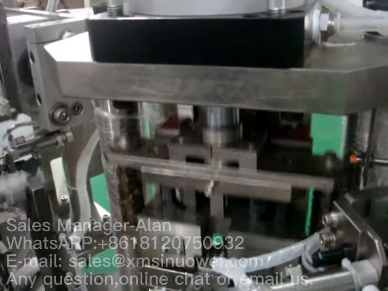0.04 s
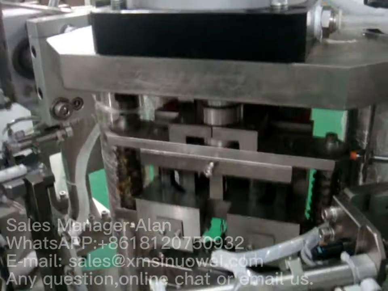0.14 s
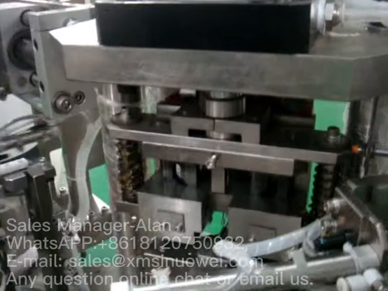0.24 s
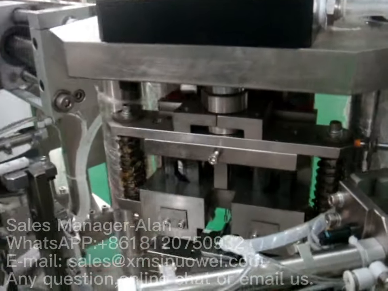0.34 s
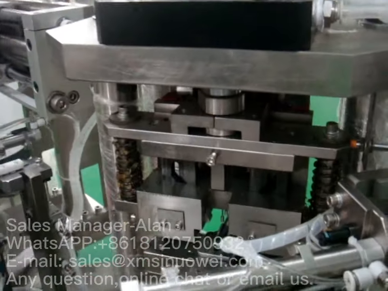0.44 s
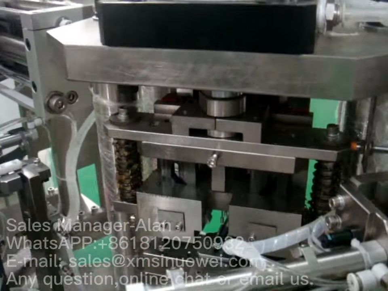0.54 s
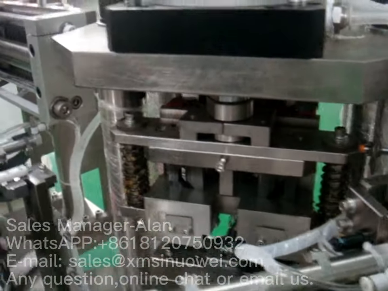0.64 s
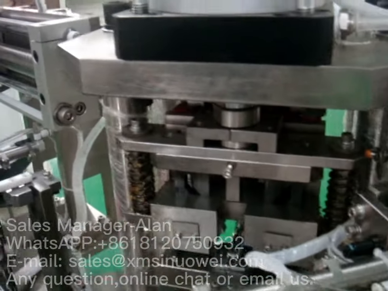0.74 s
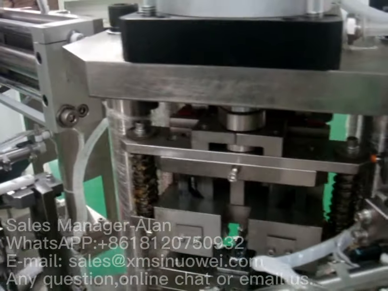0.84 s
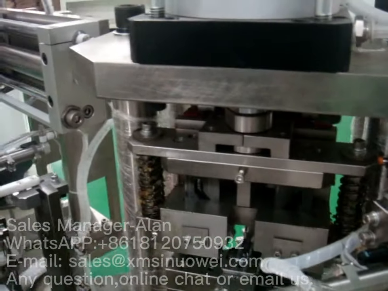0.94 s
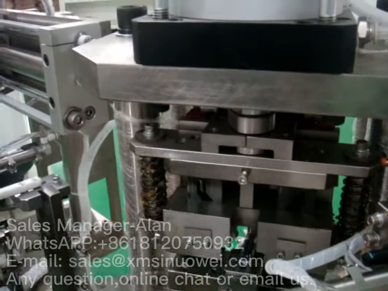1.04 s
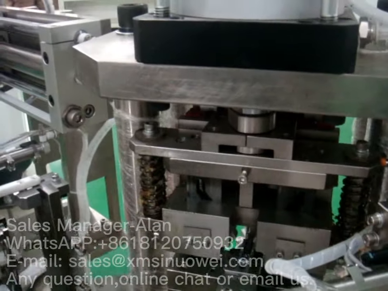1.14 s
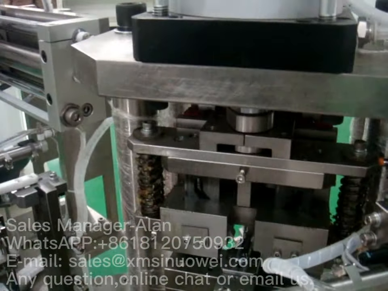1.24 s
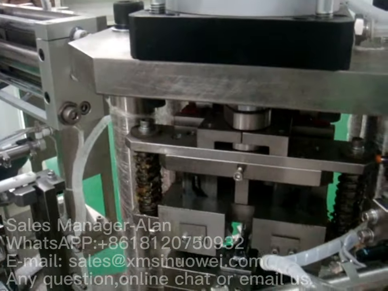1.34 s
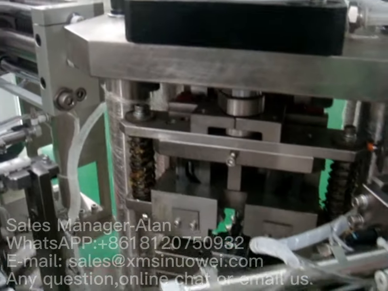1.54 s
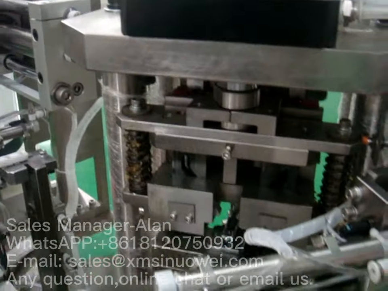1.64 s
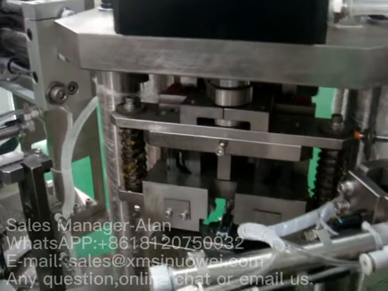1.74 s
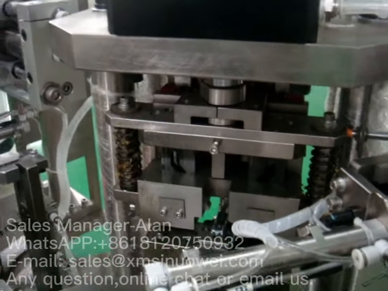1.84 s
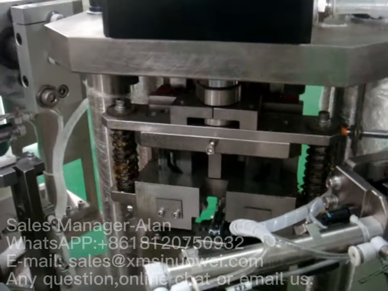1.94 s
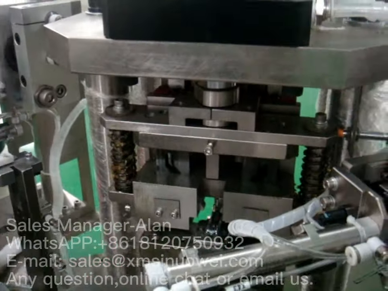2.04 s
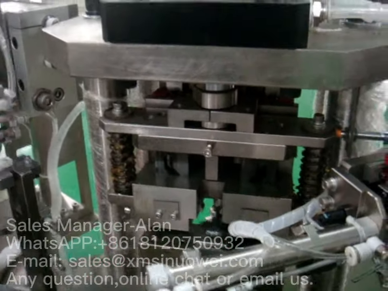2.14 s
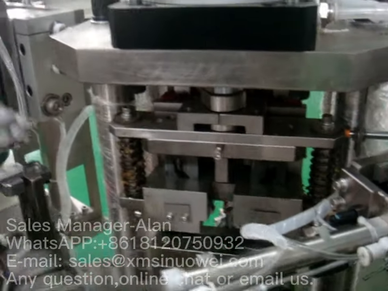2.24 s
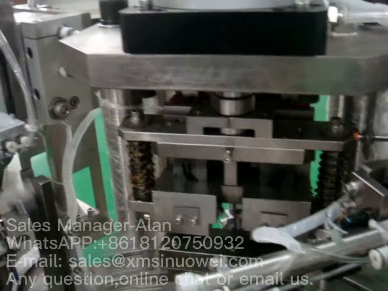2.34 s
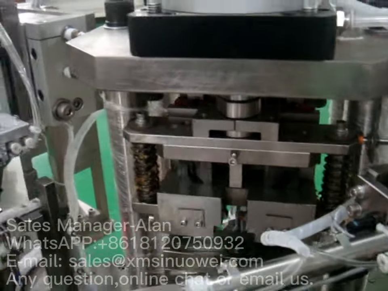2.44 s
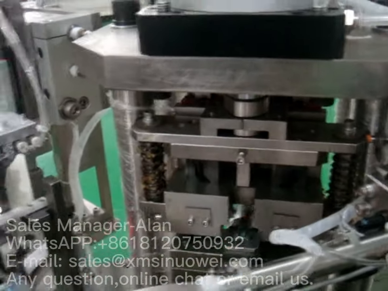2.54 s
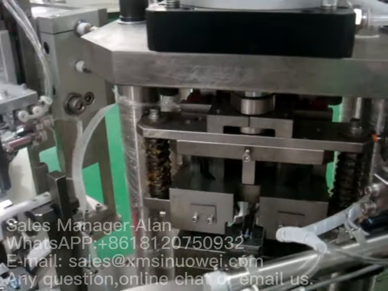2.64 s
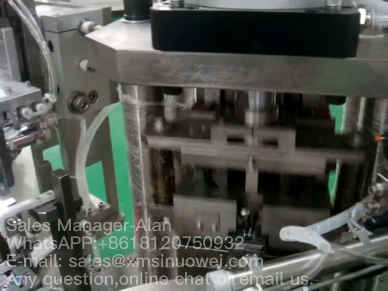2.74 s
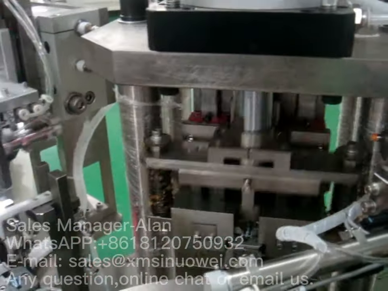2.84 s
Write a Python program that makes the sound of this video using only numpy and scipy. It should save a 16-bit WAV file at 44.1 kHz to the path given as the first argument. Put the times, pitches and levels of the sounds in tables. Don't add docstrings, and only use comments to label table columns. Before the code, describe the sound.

Throughout seven seconds, vibratory feeders close to one microphone give a steady, dense, bright hiss of tiny metal impacts, faintly pulsing at mains rate. Low-mid rumble from distant machines lies beneath, with a short dull hall echo. Quick knocks and clicks come at 0.25 to 0.55 s, then a valve snap at 0.77. Press and slide knocks fall near 1.05, a faint plate ring at 1.4, and pings and blows at 1.5 to 1.9. More pings follow around 2.4. A hard latch and press clack with air cracks hits at 2.8 to 2.95. Clicks continue from 3.4; a sharp snap lands at 4.05, a knock cluster at 4.45, then a bright plate ring at 4.57. A puff sounds at 5.08, a ringing clack at 5.68. The strongest valve and press burst comes at 6.2 to 6.45, with final clacks at 6.75 to 6.95. Loud peaks briefly dip the level.

```python
import sys
import numpy as np
from scipy import signal
from scipy.fft import rfft, irfft
from scipy.io import wavfile
from scipy.ndimage import uniform_filter1d

SR = 44100
rng = np.random.default_rng(int(sys.argv[2]) if len(sys.argv) > 2 else 0)


def undo_db(level):
    steps = np.asarray(level, float) / 20
    return 10 ** steps


def unload_audio(sound):
    columns = np.transpose(np.atleast_2d(sound))
    steps = np.round(np.clip(columns, -1, 1) * 32767)
    wavfile.write(sys.argv[1], SR, steps.astype(np.int16))


N = 306915
THIN_FROM_HZ = 5000
CYCLE_S = 3.396


def evened(x):
    return x / np.sqrt(np.mean(x ** 2) + 1e-20)


def drift(count, span):
    noise = rng.standard_normal(count)
    return evened(uniform_filter1d(uniform_filter1d(noise, span), span))


def curve(rows):
    return np.interp(np.arange(N) / SR, *np.transpose(rows))


def add(mix, s, sound):
    part = mix[round(s * SR):][:len(sound)]
    part += sound[:len(part)]


def coloured(x, spectrum, patchy_db, size):
    hz, _, z = signal.stft(x, SR, nperseg=size)
    f, db = np.transpose(spectrum)
    patches = evened(uniform_filter1d(uniform_filter1d(rng.standard_normal(z.shape), 5, 0), 5, 1))
    shape_db = np.interp(np.log(hz + 1), np.log(f + 1), db)[:, None] + patchy_db * patches
    return evened(signal.istft(z * undo_db(shape_db), SR, nperseg=size)[1][:N])


def resonate(x, hz, width_hz):
    r = np.exp(-np.pi * width_hz / SR)
    return signal.lfilter([1, 0, -1], [1, -2 * r * np.cos(2 * np.pi * hz / SR), r * r], x)


def mode_comb(x, depth_db, width_hz):
    z = rfft(x)
    ripple = drift(len(z), int(width_hz * N / SR))
    return evened(irfft(z * undo_db(depth_db * ripple), N))


def hall():
    # (time [s], level [dB])
    rumble_level = [(0.0, -30.5), (0.39, -31.5), (0.6, -30), (1.45, -32), (2.29, -29), (2.81, -30.5),
                    (3.0, -28.5), (3.35, -31.5), (4.13, -29), (4.38, -30), (4.86, -29.5), (5.6, -27.5),
                    (5.83, -28.5), (6.42, -28), (6.96, -29.5)]
    # (frequency [Hz], density [dB per Hz])
    rumble_colour = [(29, -70), (50, -45), (78, -29), (120, -17.5), (160, -17.5), (227, -16.5), (414, -9.5),
                     (530, -5), (679, -5), (968, 0.5), (1050, -3.5), (1340, -5.5), (2000, -3.5),
                     (2600, -13.5), (4400, -120)]
    # (time [s], level [dB])
    drone_level = [(0.0, -55), (0.27, -59), (1.24, -55.5), (2.13, -75), (2.3, -64), (3.55, -59),
                   (4.34, -49.5), (4.84, -61), (6.59, -53), (6.96, -59)]
    noise = mode_comb(rng.standard_normal(N), depth_db=3.0, width_hz=6.5)
    rumble = coloured(noise, rumble_colour, patchy_db=1.38, size=1024)
    drone = evened(resonate(resonate(rng.standard_normal(N), 185, 40), 206, 60))
    return undo_db(curve(rumble_level)) * rumble + undo_db(curve(drone_level) + 2.0) * drone


def walls(x):
    t = np.arange(SR // 2) / SR
    echoes = rng.choice([-1., 1.], len(t)) * (rng.random(len(t)) < .05) * (t > .012)
    tail = signal.lfilter(*signal.butter(1, 3000, fs=SR), echoes * undo_db(-60 * t / 0.7))
    return signal.fftconvolve(x, tail / np.linalg.norm(tail))[:N]


def blows(rows, rise_ms, ragged, spread, crack_db, gain_db):
    out, t = np.zeros(N), np.arange(9000) / SR
    chance = rng.standard_normal((len(rows), 8 + len(t)))
    for (s, db, hz, t60), c in zip(rows, chance):
        near = sum(np.sin(2 * np.pi * hz * np.exp(spread * c[k]) * t + 2 * c[4 + k]) for k in range(4))
        scrape_band = signal.butter(2, [hz / 1.41, hz * 2.08], "bandpass", fs=SR)
        scrape = evened(signal.lfilter(*scrape_band, c[8:]))
        crack_band = signal.butter(2, [hz / 1.18, hz * 1.84], "bandpass", fs=SR)
        crack = evened(signal.lfilter(*crack_band, c[:7:-1]))
        body = np.sin(2 * np.pi * hz * t)
        sound = np.sqrt(1 - ragged) * body + np.sqrt(ragged) * (0.34 * near + 0.54 * scrape)
        sound += undo_db(crack_db) * ragged * crack * np.exp(-t / 0.018)
        rise = (rise_ms + 0.5 * max(-22 - db, 0)) / 1000
        onset = np.sin(np.pi / 2 * np.minimum(t / rise, 1)) ** 2
        shape = onset * undo_db(-60 * np.maximum(t - rise, 0) / t60)
        strength = np.sqrt(2 * np.sum((shape * sound) ** 2) / np.sum(shape ** 2))
        add(out, s, undo_db(db + gain_db) * shape * sound / strength)
    return out


def cylinder_thuds():
    # (time [s], peak [dB], body [Hz], t60 [s])
    thud_rows = [(0.255, -28.5, 440, 0.049), (0.542, -26, 427, 0.07), (2.228, -39, 353, 0.078),
                 (1.043, -33, 388, 0.13), (1.123, -27, 600, 0.039), (1.268, -24, 470, 0.2),
                 (1.29, -28, 330, 0.12), (1.3, -36, 290, 0.1), (1.674, -21, 484, 0.096),
                 (1.702, -30, 410, 0.095), (1.744, -44, 295, 0.054), (2.105, -28, 414, 0.058),
                 (2.159, -27, 405, 0.04), (3.055, -37, 293, 0.051), (3.476, -24.5, 517, 0.073),
                 (2.932, -30, 506, 0.054), (3.833, -28, 441, .091), (3.875, -34, 194, 0.16),
                 (4.472, -35, 305, 0.17), (4.522, -27, 330, 0.09), (4.555, -37, 348, .07),
                 (4.482, -30, 600, .07), (4.692, -35, 300, .07), (6.33, -30, 543, 0.12),
                 (6.45, -31, 413, .07), (0.275, -27, 600, 0.026), (4.756, -31, 388, 0.065),
                 (5.108, -30.5, 430, 0.15), (6.063, -28, 337, 0.12), (6.254, -38, 226, 0.073),
                 (6.782, -22, 610, 0.086)]
    return blows(thud_rows, rise_ms=3.8, ragged=0.93, spread=0.061, crack_db=-3.0, gain_db=0.0)


def cushioned_stops():
    # (time [s], peak [dB], body [Hz], t60 [s])
    stop_rows = [
        (0.13, -27, 470, 0.036),
        (1.32, -32, 388, 0.15),
        (2.068, -24.5, 394.4, 0.1),
        (4.468, -26, 385, 0.06),
        (4.495, -24.5, 388, 0.062),
        (5.353, -26, 379, 0.045),
        (5.363, -21, 403, 0.036),
    ]
    return blows(stop_rows, rise_ms=7.8, ragged=0.22, spread=0.045, crack_db=0.0, gain_db=1.0)


def machine_frame(thuds):
    # (frequency [Hz], width [Hz], level [dB])
    frame_modes = [(388, 4.8, 1.5), (429, 15, -6.5), (315, 7.6, -16.5), (290, 11, 1)]
    return sum(undo_db(db + 3.0) * np.pi * width_hz / SR * resonate(thuds, hz, width_hz)
               for hz, width_hz, db in frame_modes)


def slide_knocks():
    # (time [s], peak [dB], body [Hz], t60 [s])
    knock_rows = [(0.262, -19, 1150, 0.031), (0.272, -24, 806, 0.027), (1.047, -22, 1494, 0.077),
                  (4.447, -26, 1540, 0.16), (4.464, -24.5, 1060, 0.12), (0.48, -16, 1540, 0.022),
                  (0.545, -20, 1000, .036), (0.555, -20, 1750, 0.039), (0.773, -26, 1647, 0.032),
                  (1.116, -29, 1590, .067), (1.285, -22, 1390, 0.049), (1.7, -31, 1080, 0.048),
                  (1.762, -28, 950, .046), (3.558, -21, 800, 0.013), (3.773, -20, 1500, .039),
                  (4.086, -20, 760, 0.03), (4.226, -21, 1045, 0.045), (4.256, -23, 1050, 0.043),
                  (4.409, -31, 1490, .035), (4.755, -22, 936, 0.037), (5.47, -25, 824, .1),
                  (2.914, -20.5, 1180, 0.059), (6.324, -20, 850, 0.06), (6.362, -26, 990, .09),
                  (6.764, -21, 1056, 0.044), (5.075, -32, 1660, .036), (5.674, -24.5, 737, 0.058),
                  (6.31, -17, 1740, 0.024), (0.258, -36, 1450, .03), (6.797, -21, 1430, 0.021),
                  (6.941, -15.5, 1220, 0.052)]
    return blows(knock_rows, rise_ms=2.4, ragged=0.69, spread=0.083, crack_db=-12.0, gain_db=3.0)


def twice(rows):
    first = [(s, db, hz, t60) for s, db, _, hz, t60 in rows]
    second = [(s + CYCLE_S, db, hz, t60) for s, _, db, hz, t60 in rows]
    return first + second


def press():
    # (time [s], peak [dB], peak a cycle later [dB], body [Hz], t60 [s])
    press_rows = [(1.049, -24, -24.5, 870, 0.12), (1.05, -29, -21.5, 572, 0.16),
                  (1.078, -30, -36, 697, 0.11), (1.678, -32, -16, 620, 0.11),
                  (1.684, -21.5, -22, 676, 0.14), (1.68, -21, -18, 2715, 0.12), (2, -20, -30, 3430, 0.037),
                  (2.917, -21, -10.5, 942, 0.068), (2.917, -16.5, -23, 620, 0.056),
                  (2.916, -15.5, -18.5, 2530, 0.14), (2.955, -22, -32, 856, 0.067),
                  (3.068, -20.5, -20.5, 535, 0.048)]
    # (time [s], peak [dB], peak a cycle later [dB], body [Hz], t60 [s])
    latch_rows = [
        (1.0465, -20, -14, 1250, 0.035),
        (2.815, -13, -8.5, 1277, 0.023),
        (3.371, -19, -17.5, 1260, 0.03),
    ]
    strokes = blows(twice(press_rows), rise_ms=2.7, ragged=0.83, spread=0.072, crack_db=-7.0, gain_db=3.0)
    latches = blows(twice(latch_rows), rise_ms=1.9, ragged=0.59, spread=0.066, crack_db=-23, gain_db=2.5)
    return strokes + latches


def part_pings():
    # (time [s], peak [dB], body [Hz], t60 [s])
    ping_rows = [(0.463, -13.5, 3070, 0.029), (0.673, -17, 4830, 0.039), (1.596, -17, 3450, .05),
                 (1.528, -20, 2760, 0.035), (1.529, -15.5, 3040, 0.049), (1.594, -15, 2790, 0.054),
                 (1.68, -19, 930, 0.1), (1.724, -18, 2770, .036), (1.907, -13, 3050, 0.049),
                 (2.371, -12, 2470, 0.042), (2.386, -17, 2380, 0.048), (2.438, -16.5, 2860, 0.046),
                 (2.438, -18, 3060, .046), (2.596, -20, 1530, 0.049), (2.673, -15.5, 3030, 0.051),
                 (4.054, -12.5, 4940, 0.029), (4.153, -19, 1740, 0.08), (4.295, -18, 3490, 0.11),
                 (4.443, -18, 978, 0.25), (4.547, -23, 1680, .061), (5.075, -17, 947, 0.11),
                 (5.414, -23, 1356, 0.065), (6.707, -17, 2580, .03), (6.308, -17, 3600, 0.064),
                 (6.776, -16, 2820, 0.058)]
    return blows(ping_rows, rise_ms=3.3, ragged=0.16, spread=.05, crack_db=-13.5, gain_db=0.5)


def gripper_clicks():
    # (time [s], peak [dB], body [Hz], t60 [s])
    click_rows = [(0.547, -15, 3030, 0.06), (0.86, -21, 2750, 0.037), (2.251, -19, 2620, .035),
                  (3.519, -19.5, 3900, .042), (3.703, -17, 5170, 0.037), (3.735, -10.5, 3040, 0.026),
                  (3.928, -10.5, 5750, 0.028), (4.051, -16.5, 2680, 0.039), (4.395, -17, 2360, .038),
                  (4.486, -28, 2560, 0.044), (5.6755, -10, 2384, 0.036), (5.688, -19, 2430, 0.053),
                  (5.788, -16, 1900, 0.038), (6.021, -25, 5800, 0.025), (6.451, -11.5, 2520, .035),
                  (5.676, -22.5, 1960, 0.039), (6.308, -13, 2064, 0.042), (6.316, -20, 3100, 0.062),
                  (6.334, -19, 2060, 0.065), (2.816, -15, 3020, 0.045), (2.538, -17, 2570, 0.046),
                  (2.596, -17.5, 2200, .04), (4.45, -15, 3080, .04), (0.479, -17, 3060, 0.027),
                  (5.588, -18, 2440, 0.083), (6.796, -17, 3990, .04)]
    return blows(click_rows, rise_ms=1.2, ragged=0.56, spread=0.064, crack_db=-11, gain_db=-0.5)


def valve_snaps():
    # (time [s], peak [dB], t60 [s])
    snap_rows = [
        (0.773, -2.5, 0.12),
        (2.816, -8, 0.054),
        (2.913, -2, 0.04),
        (2.922, -1.5, 0.1),
        (4.051, -0.5, 0.04),
        (5.075, -4, 0.092),
        (5.676, -16, .05),
        (6.305, -2.5, 0.11),
        (6.311, 5, 0.072),
        (6.321, -6, 0.08),
    ]
    out, t = np.zeros(N), np.arange(5000) / SR
    band = signal.butter(2, [600, 4200], "bandpass", fs=SR)
    for s, db, t60 in snap_rows:
        puff = evened(signal.lfilter(*band, rng.standard_normal(len(t))))
        add(out, s, undo_db(db - 15.5 - 60 * t / t60) * puff * np.minimum(t / 0.0007, 1))
    return out


def metal_ticks():
    # (time [s], peak [dB], centre [Hz])
    tick_rows = [(0.308, -13, 3500), (0.48, -12, 2200), (0.549, -12, 3000), (0.7732, -14, 2500),
                 (2.913, -14, 3500), (2.9162, -7, 2600), (2.9208, -14, 2200), (2.923, -11, 1800),
                 (4.0527, -5.5, 3000), (4.057, -7, 4500), (1.6815, -12, 2500), (1.69, -12, 2800),
                 (1.595, -12.5, 3000), (1.909, -14, 3000), (4.0922, -12, 5000), (4.4435, -9, 1300),
                 (5.0758, -13, 1500), (5.679, -4, 2300), (6.313, -15, 2200), (6.3226, -5, 2800),
                 (6.379, -11, 4500)]
    out, t = np.zeros(N), np.arange(200) / SR
    for s, db, hz in tick_rows:
        add(out, s, -undo_db(db + 4.0) * np.sin(2 * np.pi * hz * t) * np.exp(-1.8 * hz * t))
    return signal.lfilter(*signal.butter(3, 550, "highpass", fs=SR), out)


def plate_rings():
    # (time [s], peak [dB])
    strikes = [
        (1.385, -11.5),
        (4.569, -3),
        (5.6794, -12.5),
    ]
    # (frequency [Hz], level [dB], t60 [s])
    plate_modes = [
        [(4064, -4, .5), (4237, 3, 0.4), (4624, 9, 0.2), (4791, 1, .5), (5211, 8, 0.26), (6218, -2, 0.4),
         (5841, 1, 0.5), (6379, 5, 0.16)],
        [(3106, -3, 0.6), (3478, -12, .6), (4237, -4, .45), (2880, -15, .35), (4619, -2, 0.25), (4979, -6, .2),
         (5469, -8, 0.6), (5846, -2, 0.3), (6309, -10, 0.4), (6514, -5, 0.3), (7650, -4, 0.16)],
        [(2440, 2, 0.9), (2300, -7, .2), (2060, -5, .15), (1647, -2, 0.2), (1270, -1, 0.32)],
    ]
    out, t = np.zeros(N), np.arange(SR // 2) / SR
    for (s, db), modes in zip(strikes, plate_modes):
        for hz, mode_db, t60 in modes:
            flutter_db = drift(len(t), 300)
            tone = np.sin(2 * np.pi * (hz * t + rng.random()))
            tone *= undo_db(db - 14.0 + mode_db + flutter_db - 60 * t / t60)
            add(out, s, tone * np.minimum(t / 0.0036, 1))
    return out


def tinkles():
    sample = np.arange(1800)
    when, pitch, size = rng.random((2200, 3)).T[:, :, None]
    hz, t = 1900 + 7800 * pitch, sample / SR
    ring = undo_db(5.9 * size) * np.sin(2 * np.pi * hz * t)
    ring *= np.minimum(t / 0.0026, 1) * undo_db(-60 * t / 0.16)
    places = (when * N).astype(int) + sample
    return evened(np.bincount(places.ravel(), ring.ravel())[:N])


def feeders():
    # (time [s], level [dB])
    load_level = [(0.0, -20), (0.45, -19.5), (0.68, -20), (0.95, -20), (1.25, -20.5), (1.4, -19.5),
                  (2.3, -20), (2.8, -19.5), (3.3, -20), (3.8, -20.5), (4.53, -20), (4.62, -22),
                  (4.72, -20.5), (5.3, -20), (5.92, -21), (6.03, -19), (6.6, -19.5), (6.96, -19)]
    # (frequency [Hz], density [dB per Hz])
    rattle_colour = [(710, -36.5), (1200, -4.5), (1410, -8), (2100, -2), (2470, -0.5), (2860, 1.5),
                     (6740, 2), (9670, -1.5), (10100, -2.5), (10400, -86), (13500, -20), (22000, -120)]
    # (frequency [Hz], width [Hz], level [dB])
    bowl_modes = [(399, 24, -51.5), (697, 9.8, -47), (1050, 41, -39.5), (2145, 70, -47), (3100, 30, -58.5),
                  (5800, 1300, -38), (6680, 300, -43), (7400, 320, -45.5)]
    # (time [s], extra level [dB])
    bowl_freedom = [(0, -1), (.3, 0), (.62, 2.5), (1.1, 1), (1.5, -2), (2.15, 1.5), (2.8, 2.5), (3.1, -5),
                    (3.4, 4.5), (3.9, 1), (4.45, 3), (4.7, 8.5), (4.95, 3.5), (5.3, 1), (5.9, 2), (6.05, 4),
                    (6.4, -8.5), (6.96, -3)]
    # (time [s], level [dB])
    shaft_level = [(0, -61), (.5, -55), (.9, -57), (1.3, -56), (1.6, -66), (2.2, -67), (2.9, -67),
                   (3.5, -65), (3.7, -60), (4.3, -56.5), (5.1, -54.5), (5.5, -70), (6.1, -51), (6.5, -56),
                   (6.96, -55)]
    t = np.arange(N) / SR
    stroke = 2 * np.pi * 100.15 * t
    throb = 1 + .035 * np.cos(stroke) + .018 * np.cos(2 * stroke + 1.3)
    sizes = undo_db(2.2 * np.minimum(rng.exponential(1, N), 4)) * rng.choice([-1., 1.], N)
    impacts = evened(sizes * (rng.random(N) < 5000 / SR))
    surge_db = 0.21 * evened(uniform_filter1d(rng.standard_normal(N), 900))
    jostle = mode_comb(0.39 * impacts + rng.standard_normal(N), depth_db=0.5, width_hz=26)
    shake = throb * undo_db(surge_db) * jostle + undo_db(-14.5) * tinkles()

    load = undo_db(curve(load_level))
    rattle = undo_db(1.5) * load * coloured(shake, rattle_colour, patchy_db=-0.03, size=256)
    free_db = curve(bowl_freedom)
    bowls = np.zeros(N)
    for hz, width_hz, db in bowl_modes:
        wall_db = db + (hz > THIN_FROM_HZ) * free_db
        bowls += undo_db(wall_db) * evened(resonate(shake, hz, width_hz))

    wobble = drift(N, 6000)
    hum = undo_db(-56 + 1.1 * wobble) * np.sqrt(2) * np.sin(stroke)
    shaft_db = curve(shaft_level) - 1.4 - 1.5 * wobble[::-1]
    shaft = undo_db(shaft_db) * np.sqrt(2) * np.sin(2 * np.pi * 147.5 * t)
    return rattle + bowls * load / np.mean(load) + hum + shaft


def scene():
    thuds = cylinder_thuds() + cushioned_stops()
    hits = thuds + machine_frame(thuds) + slide_knocks() + press() + part_pings()
    hits += gripper_clicks() + valve_snaps() + metal_ticks()
    plates = plate_rings()
    echoes = undo_db(-14.0) * walls(hits + 0.5 * plates)
    mono = hall() + echoes + hits + plates + feeders()
    return np.array([mono, mono])


def gain_control(x):
    # (time [s], depth [dB], recovery [s])
    dip_rows = [
        (0.78, 4.5, 0.023),
        (2.385, 1.5, 0.031),
        (2.92, 4, 0.045),
        (4.057, 3, 0.06),
        (5.8, 0.5, 0.033),
        (6.225, 1.5, 0.068),
        (6.312, 3, 0.12),
        (6.455, 1.5, 0.041),
        (6.79, 1.5, 0.16),
    ]
    t, dip_db = np.arange(N) / SR, np.zeros(N)
    for s, depth_db, back_s in dip_rows:
        after = np.maximum(t - s, 0)
        dip_db += depth_db * (1 - np.exp(-after / 0.0015)) * np.exp(-after / back_s)
    return x * undo_db(-dip_db)


def thinned(x, under_db, from_hz):
    window = np.sqrt(np.hanning(385)[1:])
    hz, _, z = signal.stft(x, SR, window=window, nperseg=384)
    energy = abs(z) ** 2
    nearby = uniform_filter1d(energy, 5, 0)
    loudness = (energy.mean(0) / energy.mean()) ** 0.59
    masker = loudness * np.mean(energy, 1, keepdims=True)
    heard = (nearby > masker * undo_db(2 * under_db)) | (hz[:, None] < from_hz)
    return signal.istft(z * heard, SR, window=window, nperseg=384)[1][:N]


def side_patches():
    # (time [s], low edge [Hz], high edge [Hz], side level [dB])
    patch_rows = [(0.01, 6700, 8000, -33), (0.069, 6240, 8330, -30), (0.187, 6820, 8900, -30),
                  (0.395, 7530, 9000, -31), (1.027, 5730, 6930, -27), (1.163, 5200, 6300, -29.4),
                  (1.723, 6240, 7560, -32), (1.931, 6240, 7560, -27), (2.021, 4600, 5740, -32),
                  (2.234, 6910, 8400, -30), (3.044, 7530, 9710, -30), (3.763, 5180, 6300, -32),
                  (5.319, 7530, 9660, -29.5), (5.925, 6240, 7470, -29), (6.413, 7530, 9020, -30)]
    side, hz = np.zeros(N + 1024), np.fft.rfftfreq(2048, 1 / SR)
    fade = signal.windows.kaiser_bessel_derived(2048, 4 * np.pi)
    for s, low_hz, high_hz, db in patch_rows:
        patch = irfft(rfft(rng.standard_normal(2048)) * (hz > low_hz) * (hz < high_hz))
        add(side, s, undo_db(db + 1.0) * evened(patch) * fade)
    return side[1024:] * np.array([[1], [-1]])


def splash():
    # (time [s], peak [dB], low edge [Hz])
    splash_rows = [
        (2.9166, -38, 11600),
        (4.0529, -45, 13000),
    ]
    out = np.zeros(N)
    for s, db, low_hz in splash_rows:
        needle = signal.firwin(401, [low_hz, 15800], pass_zero=False, window=("kaiser", 8), fs=SR)
        add(out, s - 200 / SR, undo_db(db) * needle / needle.max())
    return out


def top_cut(x):
    return signal.sosfilt(signal.butter(12, 16000, fs=SR, output="sos"), x)


def record(dry):
    x = signal.lfilter(*signal.butter(1, 50, "highpass", fs=SR), gain_control(dry[0]))
    x = thinned(x, under_db=-3.5, from_hz=THIN_FROM_HZ) + side_patches()
    band_limit = signal.firwin(1023, 10150, window=("kaiser", 10), fs=SR)
    x = signal.oaconvolve(np.clip(x, -.7, .7), band_limit[None], "same")
    return top_cut(x + splash())


dry = scene()
out = record(dry)
unload_audio(out)
```